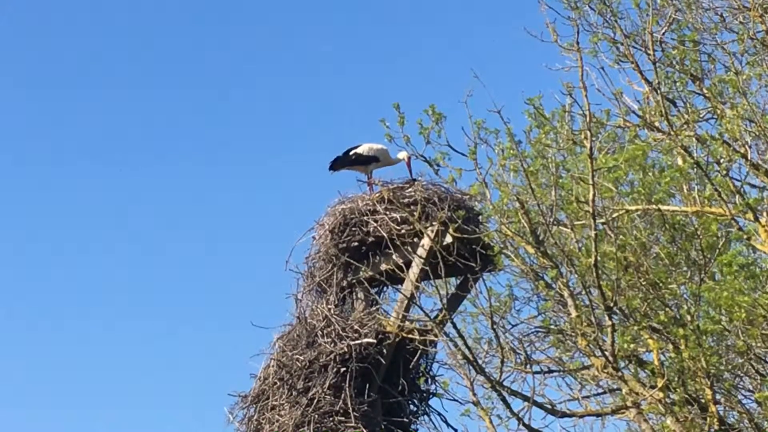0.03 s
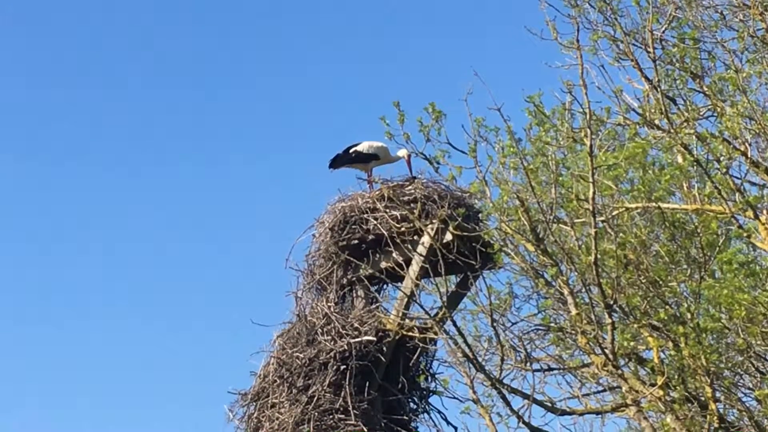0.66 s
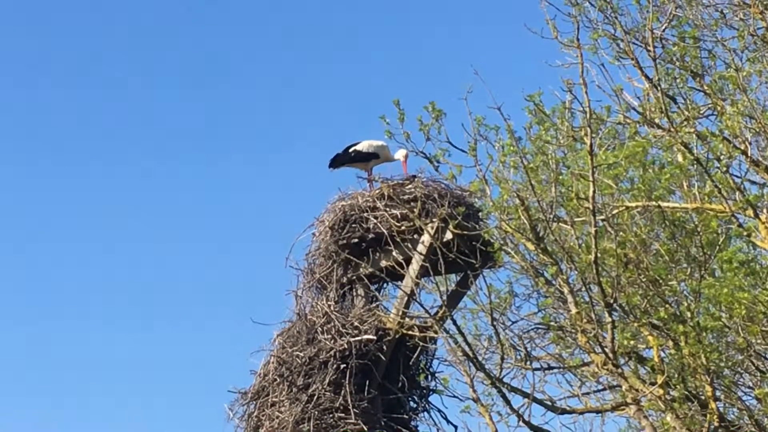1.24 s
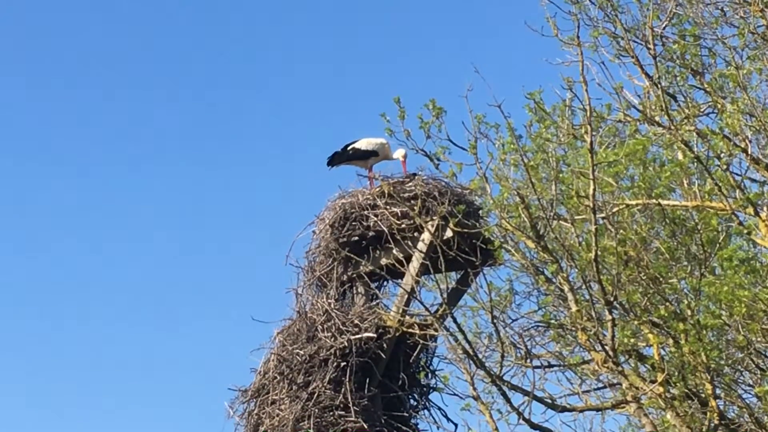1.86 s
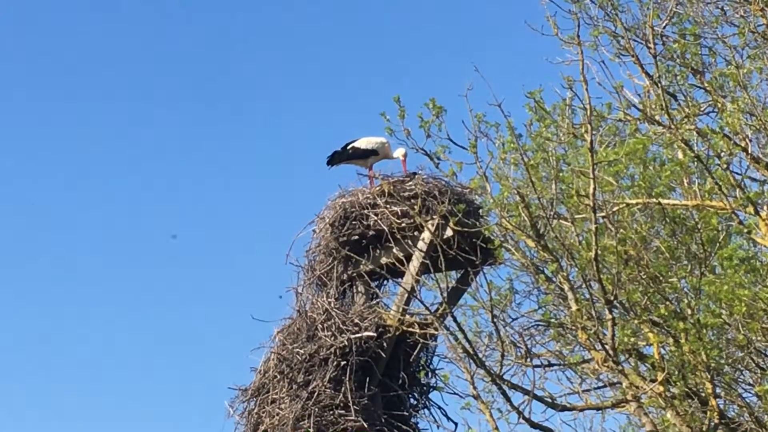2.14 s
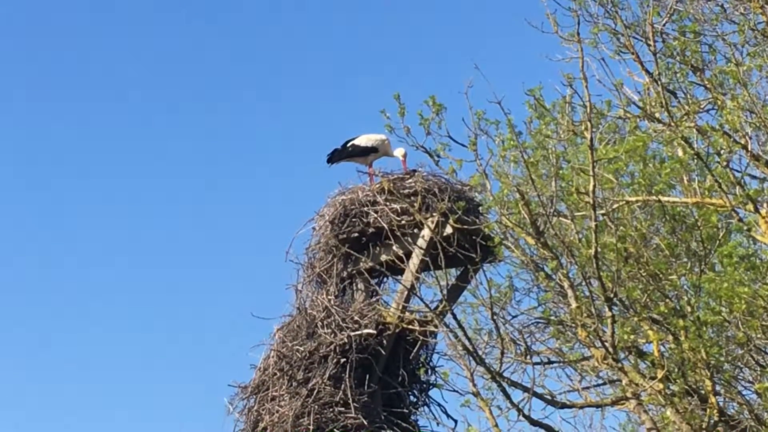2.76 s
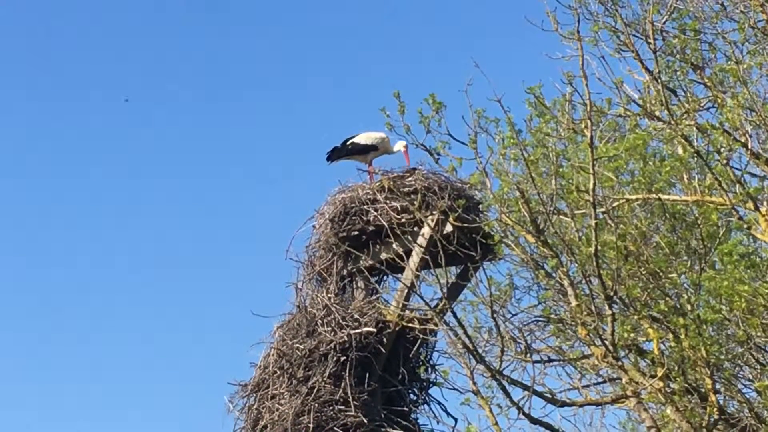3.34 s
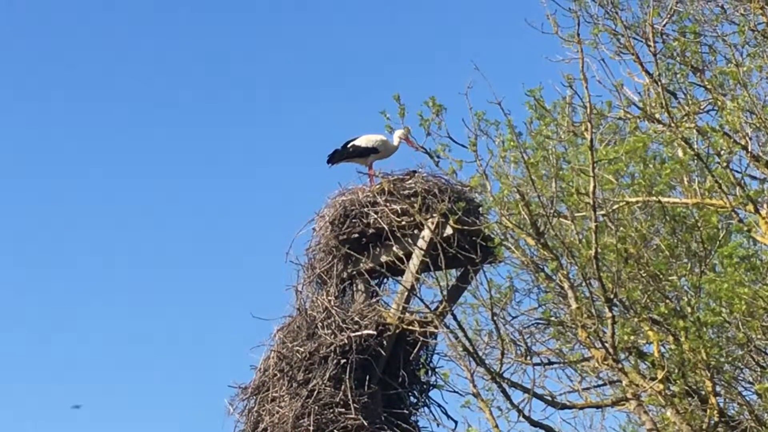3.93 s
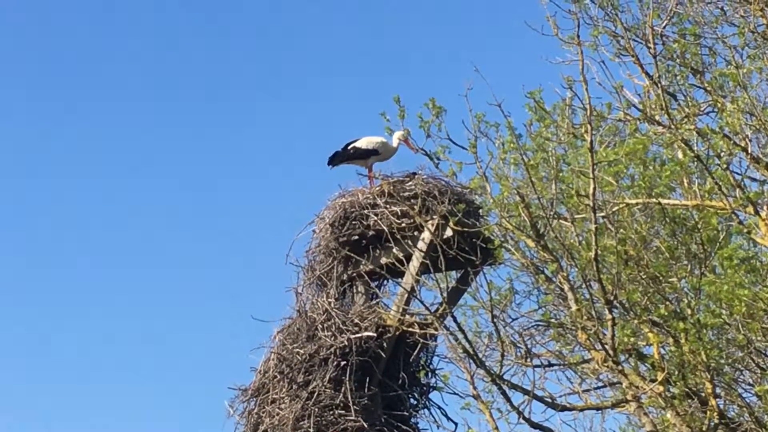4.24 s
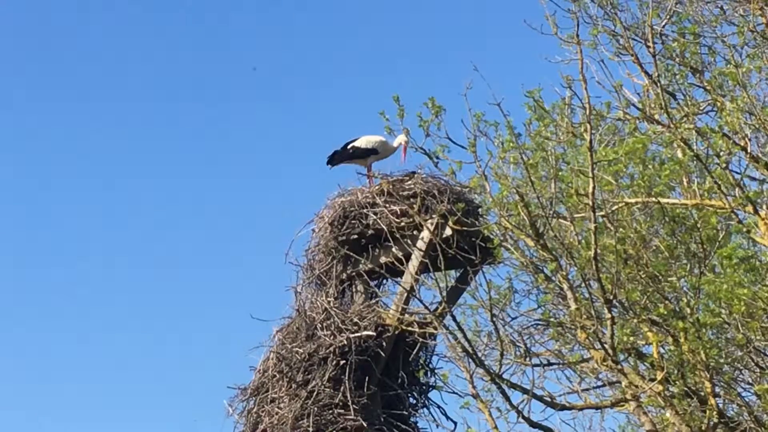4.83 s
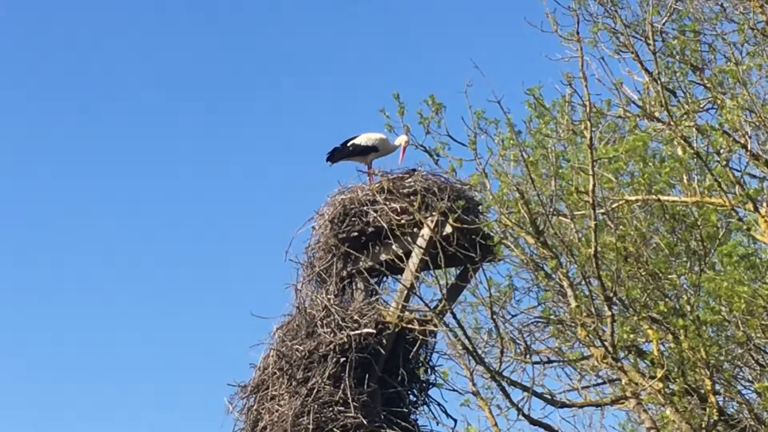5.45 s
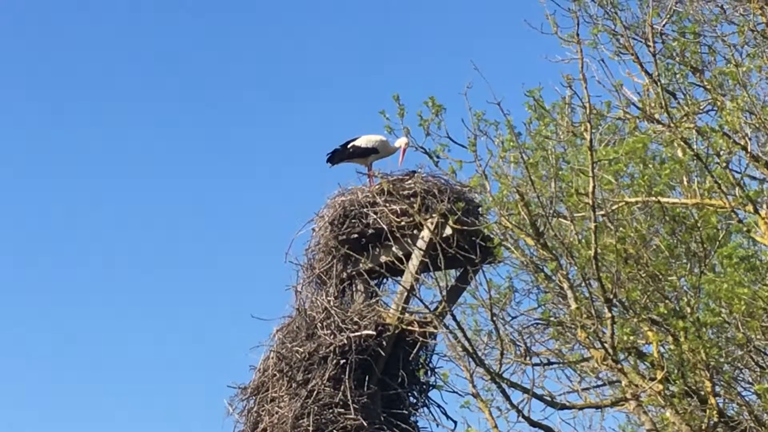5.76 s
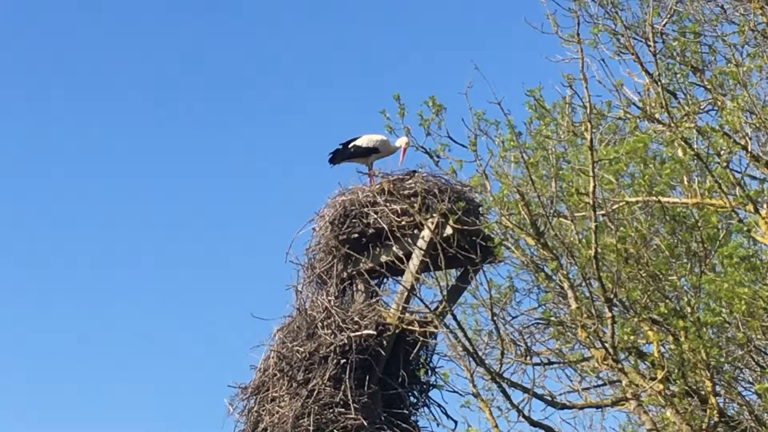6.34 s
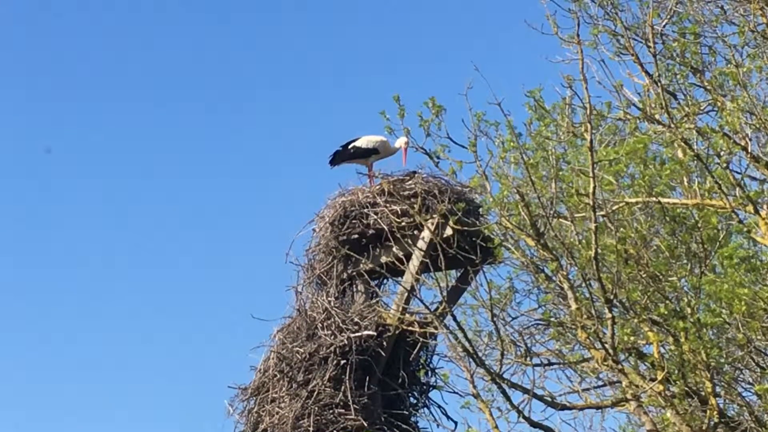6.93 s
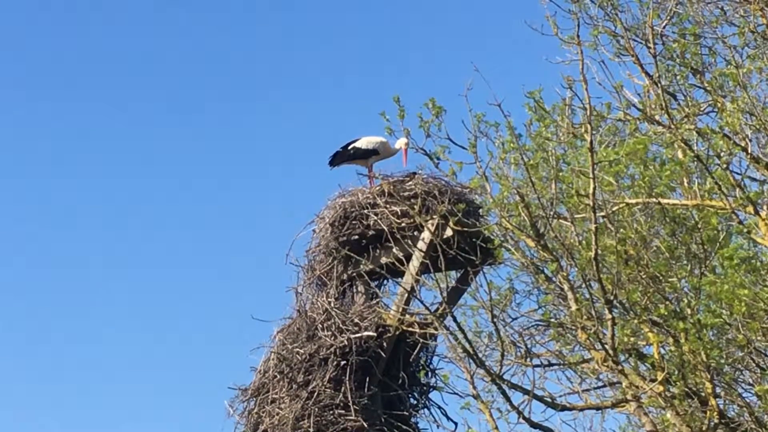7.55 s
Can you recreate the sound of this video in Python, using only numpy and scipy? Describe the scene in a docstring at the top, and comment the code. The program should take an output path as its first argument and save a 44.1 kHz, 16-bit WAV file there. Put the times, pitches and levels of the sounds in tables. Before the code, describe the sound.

A stork makes brief hollow clacking sounds outdoors, with faint songbird twittering and a soft, far-off rumble behind.

```python
"""Under a stork's nest on a calm spring day, a distant low rumble and a faint hum sound throughout,
and small songbirds chirp and twitter further off. Short hollow clacks soon begin and echo off the trees:
each is a low knock and a brief rasp that rings a narrow cavity, sinking in pitch. Midway one bird
repeats a hoarse chirp. The clacks come at a quickening pace, and the last runs into a rising squeak."""
import sys
import numpy as np
from scipy import signal
from scipy.fft import rfft, irfft, next_fast_len
from scipy.io import wavfile
from scipy.ndimage import map_coordinates

SR = 44100
rng = np.random.default_rng(int(sys.argv[2]) if len(sys.argv) > 2 else 0)


def log_audio(samples):
    """Write samples as a 16-bit WAV file to the path given in sys.argv[1]."""
    # one column per channel
    frames = np.atleast_2d(samples).T
    # limit to full scale, then quantise
    limited = np.clip(frames, -1, 1)
    pcm = np.round(limited * 32767).astype(np.int16)
    wavfile.write(sys.argv[1], SR, pcm)


N = 339129

# Background noise spectra. Each row: frequency in Hz, relative spectral density in dB.
RUMBLE_SPECTRUM = [(20, -40), (31, -24), (40, -8), (52, -2.5), (64, -2), (80, 0.5), (100, -9), (140, -12.5),
                   (210, -17.5), (270, -35), (400, -38), (900, -60)]
AIR_SPECTRUM = [(150, 5.5), (350, -5), (520, -5.5), (760, -4.5), (980, 1.5), (1250, -2), (1550, -6.5),
                (2100, -9.5), (4000, -14.5), (7000, -21.5), (10500, -20), (12000, -17.5), (15500, -16)]
CHORUS_SPECTRUM = [(1800, -12.5), (2700, 3.5), (3800, 0.5), (5400, -6.5), (6500, -9.5), (9000, -22)]
# Course of the rumble and of the far birds. Each row: time in seconds, level in dB.
RUMBLE_LEVELS = [(0, -49.5), (1.3, -50.5), (3, -50.5), (4.4, -49.5), (7.69, -49)]
CHORUS_LEVELS = [(0, -66), (.45, -72), (1.1, -70), (1.75, -73.5), (3, -69), (4.25, -65), (4.8, -72),
                 (7, -73.5), (7.3, -68.5), (7.69, -70)]
# Tones of the hum. Each row: frequency in Hz, relative level in dB.
HUM_TONES = [(277.3, 2.5), (345, -6)]
# Reverberation among the trees. Each row: frequency in Hz, seconds to decay by 60 dB.
TREE_DECAY = [(200, 0.13), (1000, 0.7), (2800, 0.4), (6000, 0.25), (14000, 0.23)]

# Falling, rising and nearly level bird notes.
# Each row: start in seconds, length in seconds, middle pitch in Hz, level in dB.
FALLING_NOTES = [(0, 0.016, 4170, -47), (.038, 0.021, 3480, -50), (.735, 0.023, 5900, -65),
                 (1.248, 0.02, 5900, -64), (1.54, 0.044, 4000, -57.5), (3.133, 0.023, 4300, -60),
                 (4.803, .03, 6100, -66), (5.748, 0.03, 5700, -69), (6.335, .022, 3400, -55)]
RISING_NOTES = [(.02, .018, 3610, -53), (.095, .025, 3620, -63), (.489, 0.021, 4100, -56.5),
                (.589, 0.025, 3370, -57), (.661, 0.023, 4130, -56.5), (1.178, .022, 3300, -59.5),
                (1.459, .04, 4100, -60), (2.125, .04, 3500, -61), (2.281, 0.016, 4950, -56.5),
                (2.57, .026, 4410, -55), (2.607, .026, 4250, -57), (3.107, 0.024, 5770, -60),
                (5.392, 0.033, 3850, -59.5)]
LEVEL_NOTES = [(.865, 0.048, 4800, -65), (.925, 0.079, 5330, -66), (1.442, 0.16, 5600, -66),
               (2.165, 0.029, 4520, -56), (2.632, 0.027, 4810, -55.5), (3.5, 0.058, 2527, -59.5),
               (4.52, 0.156, 6980, -75.5), (7.227, 0.021, 8600, -60)]
FALL, RISE, LEVEL = (1.19, .86), (.72, 1.24), (.95, 1.01)  # start and end pitch over middle pitch

# The clacks. Each row: start in seconds, level in dB, cavity frequency in Hz, swell time in seconds.
CLACK_EVENTS = [(0.27, -40.5, 2983, 0.0051), (0.789, -42.5, 2876, 0.018), (2.205, -38.5, 3000, 0.0057),
                (2.748, -40.5, 3125, .003), (3.324, -40.5, 2978, 0.0046), (3.748, -40.5, 2930, 0.0083),
                (4.204, -44.5, 2805, 0.027), (4.61, -43.5, 2815, 0.031), (5.023, -41.5, 2860, .014),
                (5.476, -41, 2740, 0.0056), (6.041, -43, 2742, 0.007), (6.395, -45, 2700, .017),
                (6.716, -43.5, 2674, 0.036), (6.998, -44.5, 2676, 0.011), (7.302, -44, 2730, 0.0099),
                (7.622, -41, 2630, .016)]
# Cavity modes. Each row: multiple of the lowest frequency, bandwidth in Hz, relative level in dB.
CAVITY_MODES = [(1, 510, -0.5), (1.932, 710, -24), (2.8, 1200, -41.5), (3.703, 750, -36), (5.2, 2210, -29)]
# Spectrum of the rasp. Each row: frequency in Hz, relative spectral density in dB.
RASP_SPECTRUM = [(300, -12), (1100, -4), (1900, -11), (4200, 5), (7000, 0), (10000, 1), (15000, -10)]

# Bouts of faint, fast twittering. Each row: start in seconds, end in seconds, level in dB.
TWITTER_BOUTS = [(1.06, 1.68, -66), (3.297, 4.452, -63), (4.75, 6.0, -70), (6.536, 6.72, -70),
                 (7.147, 7.6, -67.5)]
# Tumbling three-note phrases.
# Each row: start in seconds, note spacing in seconds, upper and lower pitch in Hz, base level in dB.
TUMBLE_PHRASES = [(1.768, 0.024, 7530, 4340, -54.5), (2.414, 0.028, 7600, 4320, -51),
                  (4.37, 0.018, 4430, 3245, -51.5), (5.905, 0.027, 3980, 3210, -56),
                  (6.25, 0.026, 4430, 3460, -52.5)]
# The notes of a tumble. Each row: length in seconds, share of the way from upper to lower pitch,
# start and end pitch over middle pitch, stress in dB.
TUMBLE_PATTERN = [(.03, 0.052, 1.03, 0.92, -9), (0.0218, .65, 1.26, 0.89, 0.5), (0.035, 1, 1.22, .87, -2)]
# Hoarse bird notes. Each row: start and length in seconds, centre and bandwidth in Hz, level in dB.
HOARSE_NOTES = [(3.117, 0.047, 7140, 1380, -64.5), (7.2, 0.044, 4400, 2850, -55.5)]

# Course of the squeak. Each row: time in seconds, pitch in Hz, relative level in dB.
SQUEAK_CONTOUR = [(7.632, 1033, -59), (7.645, 1052, -39.5), (7.655, 1163, -36), (7.666, 1230, -45),
                  (7.672, 1273, -37), (7.679, 1345, -38), (7.69, 1350, -33.5)]
# Spectral envelope of the squeak. Each row: frequency in Hz, relative level in dB.
SQUEAK_SPECTRUM = [(1100, -16.5), (2300, -7), (3500, 6), (4800, -11), (6400, -3.5), (7500, -18),
                   (9000, -13), (11000, -30), (15000, -22)]


def amp(db):
    """Amplitude grows tenfold for every 20 dB."""
    return 10 ** (np.asarray(db) / 20)


def unit(x):
    """Normalisation to an rms of 1."""
    return x / np.sqrt(np.mean(np.abs(x) ** 2) + 1e-20)


def along(points, hz):
    """Interpolation of (Hz, value) points on a logarithmic frequency axis."""
    frequencies, values = np.transpose(points)
    return np.interp(np.log(hz + 1), np.log(frequencies + 1), values)


def curves(rows):
    """Linear interpolation in time: one value per sample for each column after the first."""
    times, *columns = np.transpose(rows)
    return [np.interp(np.arange(N) / SR, times, column) for column in columns]


def wobble(rate, size):
    """Smooth random modulation: a spline through rate knots a second."""
    knots = rng.standard_normal(int(size * rate / SR) + 4)
    return map_coordinates(knots, [np.arange(size) * rate / SR])


def noise(spectrum, size):
    """Spectral shaping turns white noise into coloured noise of rms 1."""
    gain = amp(along(spectrum, np.fft.rfftfreq(size, 1 / SR)))
    return unit(irfft(rfft(rng.standard_normal(size)) * gain, size))


def phase_of(hz):
    """Phase is the time integral of angular frequency."""
    return 2 * np.pi * np.cumsum(hz) / SR


def resonance(hz, width_hz, pure):
    """A randomly driven resonance gives a narrow noise band; pure weights a steady tone at its centre."""
    kicks = rng.standard_normal((2, len(hz) + 1024))
    lowpass = signal.butter(4, width_hz / 2, fs=SR, output='sos')
    in_phase, quadrature = unit(signal.sosfilt(lowpass, kicks)[:, -len(hz):])
    phase = phase_of(hz)
    return unit((in_phase + pure) * np.cos(phase) + quadrature * np.sin(phase))


def add(track, start_s, sound):
    """Superposition: a sound adds to the track from its start time."""
    start = max(round(start_s * SR), 0)
    track[start:start + len(sound)] += sound[:max(N - start, 0)]


def tree_echo(direct, wet_db, build_s=0.0029):
    """Scattering from trunks and branches follows the direct sound with a decaying, diffuse tail."""
    hz, t, spectra = signal.stft(rng.standard_normal(SR // 2), SR, nperseg=256)
    decay = amp(-60 * t / along(TREE_DECAY, hz)[:, None])
    tail = signal.istft(spectra * decay * (1 - np.exp(-t / build_s)), SR, nperseg=256)[1]
    response = amp(wet_db) * tail / np.linalg.norm(tail)
    response[0] += 1
    return signal.fftconvolve(direct, response)


def ambience(drone_db=-77, air_db=-63, hum_db=-80, hum_db_per_s=1.51):
    """Noise bands give distant rumble, drone, soft air and far birds; two tones give a growing hum."""
    rumble = amp(curves(RUMBLE_LEVELS)[0] + 0.84 * wobble(8, N)) * noise(RUMBLE_SPECTRUM, N)
    drone = amp(drone_db) * noise([(100, -14), (230, -2.5), (350, -3), (700, -27), (2000, -69)], N)
    air = amp(air_db + 0.36 * wobble(2.68, N)) * noise(AIR_SPECTRUM, N)
    chorus = amp(curves(CHORUS_LEVELS)[0] + 2.7 * wobble(12, N)) * noise(CHORUS_SPECTRUM, N)
    hum = sum(amp(db + 1.5 * wobble(3, N)) * np.sin(phase_of(hz * (1 + .004 * wobble(4, N))))
              for hz, db in HUM_TONES)
    hum_gain = amp(hum_db + hum_db_per_s * np.arange(N) / SR)
    return rumble + drone + air + chorus + hum_gain * hum


def glide(hz, shape):
    """Frequency ratios set a note's start and end about its middle pitch."""
    return hz * np.array([shape[0], 1, shape[1]])


def whistle(length_s, glide_hz, db, branch_gain=0.24):
    """A modulated tone flutters through three pitches; a near branch reflects one distinct copy."""
    progress = np.linspace(0, 1, int(length_s * SR))
    size = len(progress)
    hz = np.polyval(np.polyfit([0, .5, 1], glide_hz, 2), progress)
    hz = hz + (25 + .085 * np.ptp(hz)) * wobble(600, size)  # wide glides tremble most
    envelope = np.abs(np.sin(np.pi * progress)) ** .5 * amp(db + 2.85 * wobble(240, size))
    note = envelope * np.sin(phase_of(hz))
    delay = int(SR * rng.uniform(.012, .03))
    pair = np.pad(note, (0, delay)) + branch_gain * np.pad(note, (delay, 0))
    return tree_echo(pair, wet_db=-3, build_s=.006)


def calls():
    """Single songbird notes: tones that rise, fall or hold their pitch, and hoarse bands of noise."""
    track = np.zeros(N)
    for notes, shape in (RISING_NOTES, RISE), (FALLING_NOTES, FALL), (LEVEL_NOTES, LEVEL):
        for start, length, hz, db in notes:
            add(track, start, whistle(length, glide(hz, shape), db))
    for start, *note in HOARSE_NOTES:
        add(track, start, buzz(*note))
    return track


def clack(cavity_hz, length_s, swell_s, knock_db, sink=0.0792,
          rasp_db=-26, rasp_t60_s=0.35, knock_hz=230, knock_s=0.005):
    """A sudden contact swells into a rasp and excites a cavity, whose resonances sink as it opens."""
    t = np.arange(SR // 6) / SR
    onset = np.sin(np.pi / 2 * np.minimum(t / .0015, 1)) ** 2
    burst = onset * (1 - 0.86 * np.exp(-t / swell_s)) * np.exp(-(t / length_s) ** 3)
    shift = sink * (.4 - np.minimum(t / length_s, 1.3))
    # the lowest mode sinks by the widest interval and rings the purest
    ring = burst * sum(amp(db) * resonance(cavity_hz * (ratio + shift), width, pure=.9 / ratio ** 2)
                       for ratio, width, db in CAVITY_MODES)
    ring = ring / np.sqrt(np.sum(ring ** 2) / (length_s * SR))
    crackle = unit(amp(3.3 * wobble(900, len(t))) * noise(RASP_SPECTRUM, len(t)))
    rasp = amp(rasp_db - 60 * t / rasp_t60_s) * onset * crackle
    # the soft low knock swells and dies within a few cycles
    knock_envelope = (t / (2 * knock_s)) ** 2 * np.exp(2 - t / knock_s)
    knock = knock_envelope * np.sin(2 * np.pi * knock_hz * rng.uniform(.94, 1.06) * t)
    return ring + rasp + amp(knock_db) * knock


def clacks(usual_s=0.0401, usual_db=-42.5, shortening_per_db=0.0347, knock_db=-53.5, knock_db_per_s=0.47):
    """Impacts reverberate among the trees; harder ones end sooner, and the knock grows with time."""
    track = np.zeros(N)
    for start, db, cavity_hz, swell_s in CLACK_EVENTS:
        length_s = usual_s * np.exp(-shortening_per_db * (db - usual_db))
        relative_knock_db = knock_db + knock_db_per_s * start - db
        direct = clack(cavity_hz, length_s, swell_s, relative_knock_db)
        add(track, start, amp(db) * tree_echo(direct, wet_db=-6, build_s=0.0027))
    return track


def twitter(spacing_s=.04):
    """Short, arched frequency glides at jittered intervals merge into a soft twitter."""
    track = np.zeros(N)
    for start, end, db in TWITTER_BOUTS:
        for beat in np.arange(start, end, spacing_s):
            late, length, pitch_hz, slope = rng.uniform([0, .014, 2800, -.28], [.03, .032, 5000, .24])
            glide_hz = pitch_hz * np.array([1 - slope, 1.1, 1 + slope])
            add(track, beat + late, whistle(length, glide_hz, db))
    return track


def tumbles():
    """Three glides descend a pitch interval: a soft held note, a steep drop, then a longer slur."""
    track = np.zeros(N)
    for start, spacing, upper_hz, lower_hz, db in TUMBLE_PHRASES:
        for k, (length, share, *shape, stress_db) in enumerate(TUMBLE_PATTERN):
            hz = upper_hz * (lower_hz / upper_hz) ** share
            add(track, start + k * spacing, whistle(length, glide(hz, shape), db + stress_db))
    return track


def buzz(length_s, hz, width_hz, db):
    """A swell of band-limited noise is heard as a hoarse note, scattered by the trees."""
    swell = np.hanning(int(length_s * SR))
    band = resonance(np.full(len(swell), hz), width_hz, pure=0)
    return tree_echo(amp(db) * swell * band, wet_db=-1)


def song(start_s=3.216, spacing_s=.133, slowing_s=.001, note_s=.035, hz=4420):
    """Tone plus noise makes a hoarse upward chirp, repeated about seven times a second and slowing."""
    track = np.zeros(N)
    for k in range(11):
        onset_s = start_s + k * (spacing_s + k * slowing_s)
        add(track, onset_s, whistle(note_s, glide(hz, RISE), db=-59))
        add(track, onset_s, buzz(note_s, hz, width_hz=1700, db=-61.5))
    return track


def squeak(roughness=0.42, gain_db=-7):
    """A harmonic series on a rising fundamental, roughened by noise and flickering overtones."""
    start = SQUEAK_CONTOUR[0][0]
    pitch_hz, db = (curve[int(start * SR):] for curve in curves(SQUEAK_CONTOUR))
    size = len(db)
    phase = phase_of(pitch_hz * (1 + .015 * wobble(500, size)))
    voice = sum(amp(along(SQUEAK_SPECTRUM, k * pitch_hz) + 3 * wobble(150, size)) * np.sin(k * phase)
                for k in range(1, 12))
    rough_voice = unit(voice) + roughness * noise(SQUEAK_SPECTRUM, size)
    track = np.zeros(N)
    add(track, start, tree_echo(amp(db + gain_db) * rough_voice, wet_db=-0.5))
    return track


def scene():
    """The pressures of all sources add at one listening point."""
    return (clacks() + squeak() + calls() + song() + tumbles() + twitter() + ambience())[None]


def record(dry, cutoff_hz=15850):
    """An ideal low-pass filter removes everything above the band limit."""
    size = next_fast_len(N + SR // 2)
    passband = np.fft.rfftfreq(size, 1 / SR) < cutoff_hz
    return irfft(rfft(dry, size) * passband, size)[:, :N]


dry = scene()
out = record(dry)
log_audio(out)
```